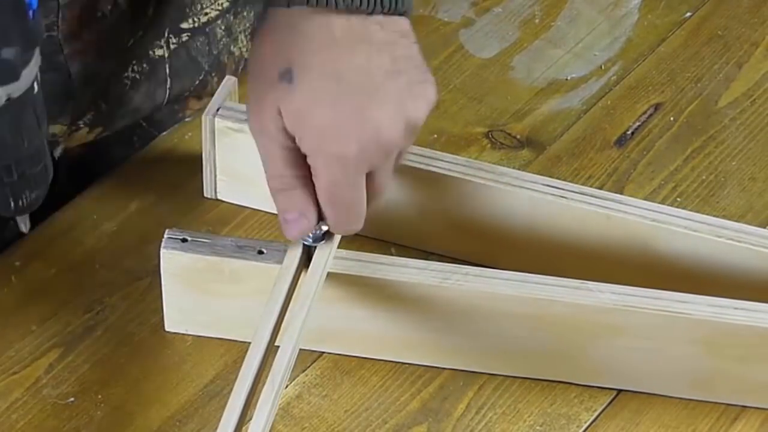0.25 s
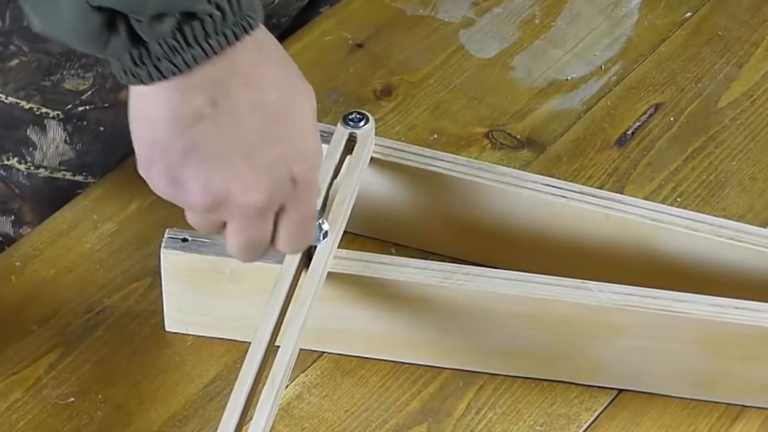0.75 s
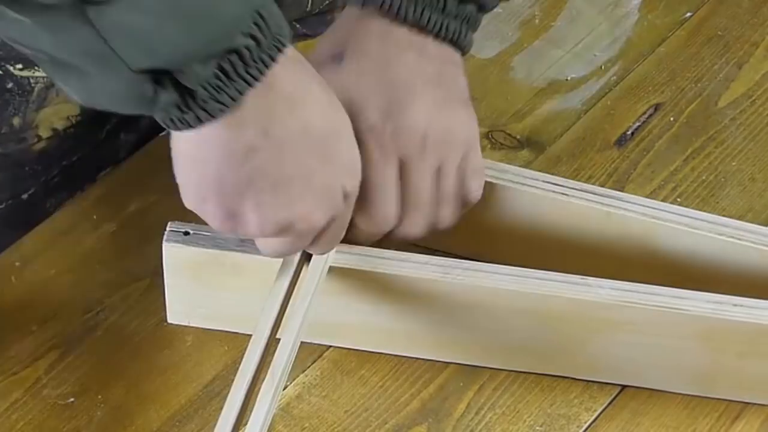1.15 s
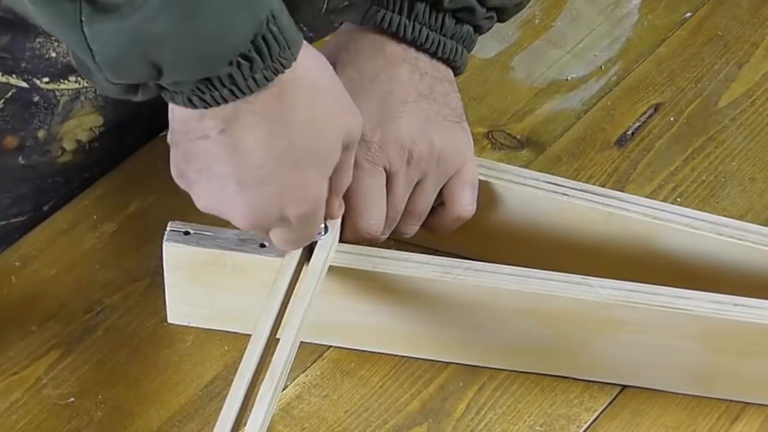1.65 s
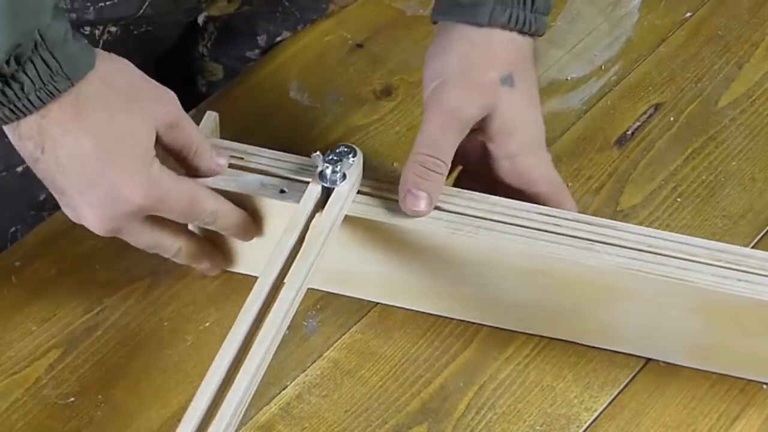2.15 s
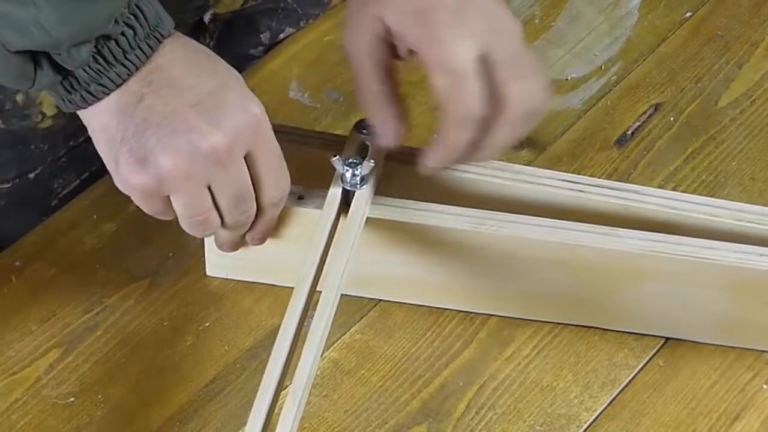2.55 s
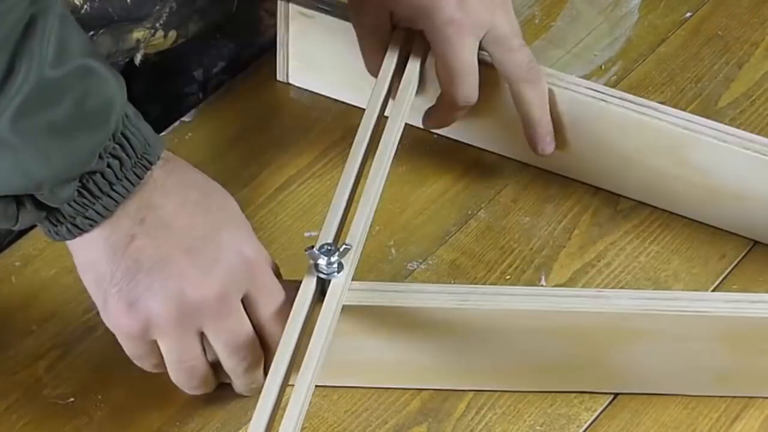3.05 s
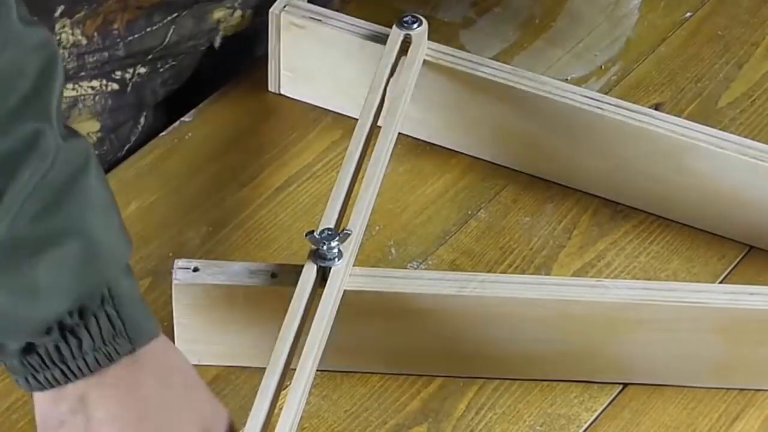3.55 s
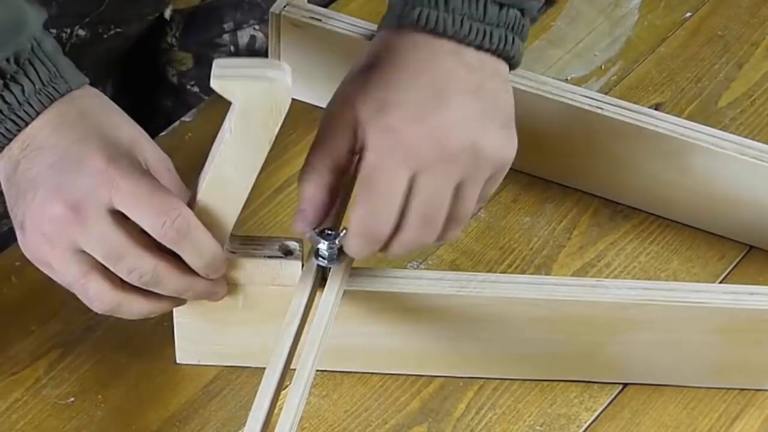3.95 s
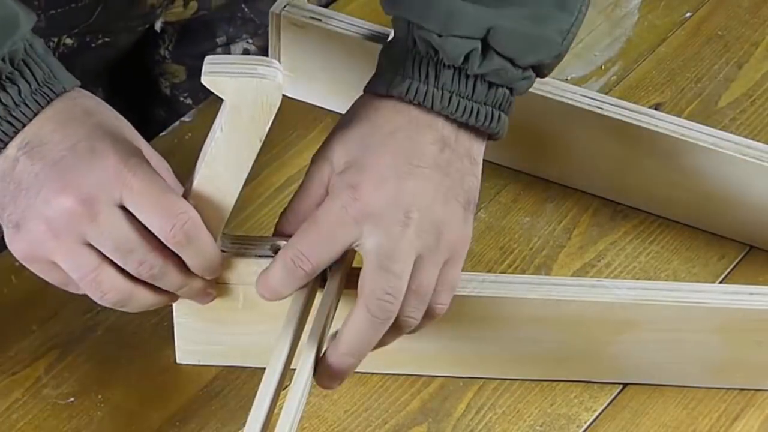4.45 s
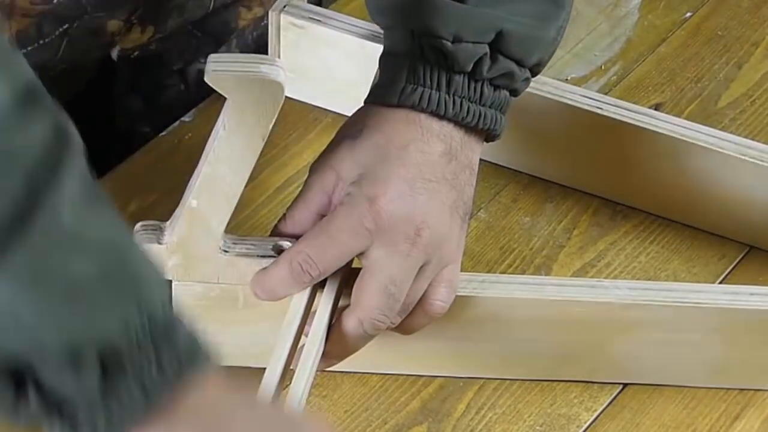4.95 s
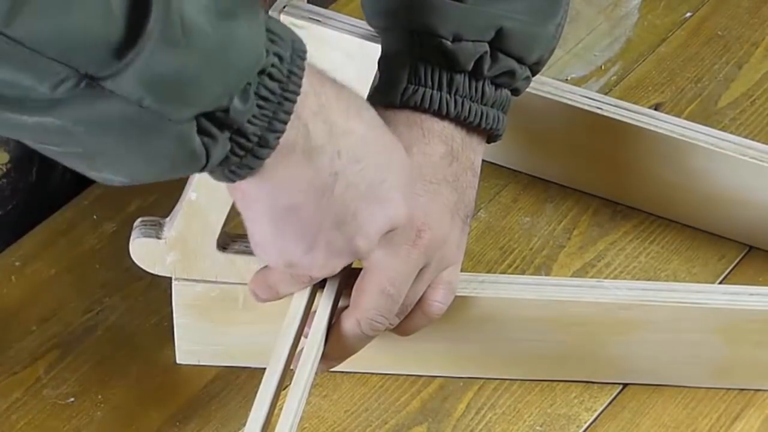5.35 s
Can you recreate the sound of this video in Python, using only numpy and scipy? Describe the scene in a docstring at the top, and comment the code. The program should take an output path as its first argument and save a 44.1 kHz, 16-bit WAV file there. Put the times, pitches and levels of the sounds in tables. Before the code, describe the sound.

Plywood pieces knock and slide against each other up close, with a small metal clink and faint sleeve rustle.

```python
"""At a workbench, close to a small stereo microphone, plywood parts of a jig are knocked and slid together.
Every contact shakes the same boards; most rattles are cut short, fading out within about a tenth
of a second. A wing nut clinks on its bolt three times. Sleeves and fingers rustle in between,
over a faint workshop hiss with a whirr in it."""
import sys
import numpy as np
from scipy import signal
from scipy.io import wavfile

SR = 44100
rng = np.random.default_rng(int(sys.argv[2]) if len(sys.argv) > 2 else 0)


def transcribe(u):
    """Save the signal u as a 16-bit wav file named by the first command-line argument.

    u: samples, shape (n,) or (channels, n), limited to [-1, 1]; the rate is SR.
    q: integer samples, one column per channel.
    """
    v = np.clip(np.atleast_2d(u).T, -1, 1)
    q = np.round(v * 32767).astype(np.int16)
    wavfile.write(sys.argv[1], SR, q)


N = 246519

# Wood on wood: t/s, body level/dB, thud over body/dB, brightness, crack over rattle/dB,
# favoured f/Hz, nominal t60/s
KNOCKS = [(0.071, -55.5, 7.5, -4, 14.5, 1260, 0.17), (0.127, -19, -16.5, -6, 13.5, 1060, 0.25),
          (0.228, -30, -10.5, -22, 12.5, 1145, 0.17), (0.281, -27.5, -10.5, -16, -3.5, 1866, 0.19),
          (0.351, -31, -10.5, -23.5, 11, 1360, 0.14), (0.528, -20, -16.5, -2, -0.5, 1700, 0.14),
          (0.555, -25, -10.5, -8.5, -7, 1063, 0.19), (0.789, -24, 1, -8, 16.5, 432, 0.18),
          (0.8587, -23.5, -11, -33, 11, 1630, .13), (1.057, -42, -8.5, -22, 2, 1125, 0.34),
          (1.092, -37.5, -8, 5, 5, 1550, 0.12), (1.134, -26, -13.5, -7.5, 5.5, 1065, 0.16),
          (1.168, -48, 3.5, 1, 0, 670, 0.18), (1.635, -59.5, -34, 1, 13, 2260, 0.084),
          (1.733, -52, -14, -1, 9, 1010, 0.21), (1.944, -37.5, 0, 0, 9, 1180, .11),
          (2.038, -23, -4.5, -10.5, 9, 1630, 0.14), (2.149, -30.5, -0.5, -6, 12, 1690, 0.18),
          (2.206, -29, -9.5, -12.5, 6.5, 1075, 0.21), (2.231, -40, 3, -2, 1, 1270, 0.24),
          (2.303, -33.5, -10, -9.5, 4.5, 1290, .15), (2.365, -24.5, -10, -2, 0.5, 1170, 0.13),
          (2.388, -24.5, -5, -9, 15, 2330, .18), (2.42, -29.5, -13, -5, -6, 1174, 0.15),
          (2.504, -24.5, -8.5, -12, -5, 1270, 0.12), (2.531, -24, -7.5, -9.5, 7, 1400, .16),
          (2.6, -39.5, -5.5, -16.5, -13, 965, 0.25), (2.713, -57, 3.5, 6, -4.5, 3010, 0.32),
          (2.763, -44.5, -3, -28, 6, 980, 0.37), (2.788, -38.5, -15, -12, 4, 1610, 0.14),
          (2.82, -28.5, -9, -8.5, -6, 1350, 0.13), (2.889, -58.5, 13, -18, 6, 665, 0.11),
          (2.945, -42, -7.5, -19, 5, 990, 0.38), (2.999, -53, 8.5, 10, 6, 1770, 0.44),
          (3.174, -44.5, 3, -27, 2, 674, 0.079), (3.449, -61.5, 11, -27, -15, 520, 0.15),
          (3.622, -41.5, -14, 2, 5.5, 2310, 0.25), (3.676, -25, -14.5, 3, 11.5, 1258, 0.14),
          (3.902, -24.5, -22, -8, 10, 2020, 0.19), (4.903, -22, -7, -3.5, -5, 1770, 0.15),
          (5.004, -34.5, -8.5, 9.5, 5, 2360, 0.17), (5.18, -59.5, -3.5, -1.5, 15.5, 2194, 0.3),
          (5.293, -49, -29, -0.5, 4.5, 2220, 0.15)]
# Factor on t60 for thud, body, clack, tick and air: the low end dies first
BAND_DECAY = [0.6, 0.7, 0.79, 0.8, 1.011]
RISE_S, LENGTH_SHARE = .001, 0.61   # the rattle's attack; its length as a share of the nominal t60


def knocks():
    """A sharp crack, then a rattle that fades out abruptly: both as envelopes in five bands."""
    shaking, cracks = np.zeros((5, N)), np.zeros((5, N))
    for s, body_db, thud_db, brightness, crack_db, hz, t60 in KNOCKS:
        gains = band_gains(body_db, thud_db, brightness, hz, crack_db)
        t = np.arange(round(LENGTH_SHARE * t60 * SR)) / SR
        attack = np.minimum(t / RISE_S, 1)
        decay = amp(-60 * t / np.outer(BAND_DECAY, t60))
        fade_out = np.cos(np.pi / 2 * t / t[-1])
        add(shaking, round(s * SR), gains * attack * decay * fade_out)
        add(cracks, round(s * SR), amp(crack_db) * gains)
    return shaking, cracks


# Wood along wood, and a sleeve brushing past at 3.856 s: peak t/s, body level/dB, brightness, favoured f/Hz,
# length/s
SLIDES = [(0.1, -62.5, 12, 1120, 0.095), (0.113, -39, -32, 1660, 0.028), (.775, -56, 4.5, 1120, 0.16),
          (1.215, -72.5, 11.5, 1070, 0.052), (1.412, -68.5, -10, 667, 0.079), (1.532, -68, 4.5, 1040, 0.12),
          (1.597, -65, 0.5, 1740, 0.052), (1.807, -57, 0.5, 1070, 0.032), (1.92, -53, 7.5, 1090, 0.08),
          (1.981, -67, -15, 1120, 0.11), (2.282, -56, -23, 1320, 0.097), (2.495, -53, 11, 1020, 0.08),
          (3.007, -47, -14, 1305, 0.15), (3.034, -40, 2, 1830, 0.078), (3.084, -43.5, -9, 1100, 0.063),
          (3.187, -48.5, 1, 664, 0.078), (3.648, -46, 2, 1330, 0.031), (3.667, -38.5, -6, 1250, 0.023),
          (3.736, -45.5, 0.5, 1230, 0.081), (3.856, -67.5, 10, 1850, 0.12), (4.12, -66, 3.5, 1800, 0.034),
          (4.194, -66.5, 2, 2590, 0.11), (4.263, -52, -12, 1085, 0.085), (4.325, -57.5, 3, 1910, 0.08),
          (4.872, -56.5, 1.5, 2180, 0.07), (5.197, -65, -10, 2290, 0.17), (5.41, -65, 0.5, 3060, 0.071),
          (5.469, -67, 1, 3070, 0.09), (5.541, -65.5, -3, 2620, 0.068)]
SWELL_SHARE, SLIDE_THUD_DB = 0.33, -14.5   # attack as a share of the length; thud over body


def slides():
    """Rubbing parts shake the boards in a soft swell and a longer fade: envelopes in five bands."""
    shaking = np.zeros((5, N))
    for s, body_db, brightness, hz, length in SLIDES:
        swell, fade = round(SWELL_SHARE * length * SR), round((1 - SWELL_SHARE) * length * SR)
        stroke = np.r_[np.hanning(2 * swell)[:swell], np.hanning(2 * fade)[fade:]]
        add(shaking, round(s * SR) - swell, band_gains(body_db, SLIDE_THUD_DB, brightness, hz) * stroke)
    return shaking


def band_gains(body_db, thud_db, brightness, hz, crack_db=0):
    """Thud, body, clack, tick and air gains of a contact; a higher or harder one clacks more."""
    clack_db, tick_db, air_db = np.array([-2, 1.5, 2.5]) + brightness * np.array([0.37, 0.68, 1.92])
    clack_db += 4.5 * np.log2(hz / 1500) + 0.49 * crack_db
    return amp(body_db + np.array([thud_db, 0, clack_db, tick_db, air_db]))[:, None]


# The ring of the plywood: f/Hz, width/Hz (the narrowest are widened in play), level/dB
BOARD_MODES = [(431, 46, -11), (521, 35.5, -5), (671, 26.7, -4.5), (935.5, 21, -27.5), (1120, 26, -2),
               (1335, 17, -24.5), (1262, 55, -6.5), (1560, 17, -28.5), (1721, 20, -3), (1814, 84, -6),
               (1964, 120, -7.5), (2249, 84, -3), (2607, 110, -6), (3060, 180, -7), (3333, 47, -6.5),
               (3900, 333, -10), (4490, 57, -11.5), (4700, 33, -22), (6600, 540, -17.5)]
# Edges of the thud, body, clack, tick and air bands: f/Hz
BAND_EDGES_HZ = [300, 800, 1700, 3600, 8000, 17000]
# Stereo width of the rattle in those bands: side over mid/dB
WIDTH_DB = [-20, -21.5, -11, -8, -9.5]
GRAIN_DB, BETWEEN_MODES_DB, BUMP_DB = 1.5, -12, 8
MIC_LOW_HZ, RATTLE_TOP_HZ = 353, 8950   # the microphone drops the bass; wood damps the highest tones


def boards(shaking, cracks):
    """Grainy noise rings the boards' modes; each crack arrives ahead of it, bypassing them."""
    grain = amp(GRAIN_DB * flicker(150)) * rng.standard_normal((2, 2, N))   # two mid/side pairs
    rattle, crack = 0, 0
    for k, (low, high) in enumerate(zip(BAND_EDGES_HZ, BAND_EDGES_HZ[1:])):
        width_gain = np.sqrt(SR / 2 / (high - low))
        noise = band(grain[k % 2] * shaking[k] + 1e-12, low, high)   # neighbouring bands unrelated
        rattle += width_gain * noise * [[1], [amp(WIDTH_DB[k])]]
        crack += width_gain * (-1) ** k * band(cracks[k] + 1e-12, low, high)
    crack = np.convolve(crack, np.hanning(4) / 2)[:N]   # wood gives: a rounded contact
    rattle = roll_off(rattle, RATTLE_TOP_HZ, "low", order=1)
    wood = amp(BETWEEN_MODES_DB) * rattle - crack * [[1], [0]]   # the crack sits dead centre
    for (hz, width_hz, level_db), strength in zip(BOARD_MODES, mode_strengths()):
        wood += amp(level_db) * resonance(rattle * strength, hz, max(width_hz, 50, hz / 35))
    wood = roll_off(wood, MIC_LOW_HZ, "high", order=8)
    jolt = grain[1] * (amp(-21) * shaking[0] + amp(-29.5) * shaking[1] + amp(-12) * cracks[0])
    bump = amp(BUMP_DB) * band(jolt, 110, 667, order=1)   # faint weight under each contact
    return left_right(*wood) + left_right(bump[0], 0.33 * bump[1])


def mode_strengths(chance_db=4, favour_db=10, favour_octaves=.05):
    """Each contact drives the modes in a new random balance, hardest near its favoured pitch."""
    onsets = [(s, hz) for s, *_, hz, t60 in KNOCKS]
    onsets += [(s - SWELL_SHARE * length, hz) for s, *_, hz, length in SLIDES]
    onsets = np.array(onsets)
    scatter_db = chance_db * rng.standard_normal((len(onsets), len(BOARD_MODES)))
    octaves_off = np.log2(np.array(BOARD_MODES)[:, 0] / onsets[:, 1:])
    strengths = amp(scatter_db + favour_db * np.exp(-.5 * (octaves_off / favour_octaves) ** 2))
    order = np.argsort(onsets[:, 0])
    latest = np.searchsorted(onsets[order, 0], np.arange(N) / SR, side="right") - 1
    return strengths[order][np.maximum(latest, 0)].T


# Small metal accents: t/s, peak level/dB, lowest partial f/Hz
CLINKS = [(1.631, -46, 2520), (2.149, -29, 5110), (2.714, -56, 3060)]
# The ring of the nut: multiple of the lowest partial, level/dB, width/Hz
NUT_PARTIALS = [(1, 0, 70), (1.48, -14, 120)]


def wing_nut(t60=0.083):
    """The nut clinks on its bolt: a short jingle of noise rings narrow metal partials."""
    out, t = np.zeros((1, N)), np.arange(round(.1 * SR)) / SR
    for s, level_db, hz in CLINKS:
        jingle = rng.standard_normal(len(t)) * amp(-60 * t / t60)
        ring = sum(amp(db) * resonance(jingle, hz * ratio, width) for ratio, db, width in NUT_PARTIALS)
        add(out, round(s * SR), amp(level_db) * ring[None] / np.abs(ring).max())
    return out


# Fader moves of the rustle: t/s, level below about 3 kHz/dB, level above/dB
RUSTLE_LEVELS = [(0.0, -63.5, -64.5), (0.12, -58.5, -59), (0.3, -59, -62.5), (0.55, -63.5, -67.5),
                 (0.68, -62, -59.5), (1.039, -61.5, -64.5), (1.57, -69, -74), (1.8, -67, -71),
                 (2.01, -58, -62), (2.13, -63.5, -67.5), (2.4, -56.5, -58), (2.79, -63.5, -72),
                 (2.94, -56.5, -59), (3.3, -64.5, -65), (3.559, -67, -68), (3.69, -54, -58),
                 (3.8, -63.5, -66), (4.599, -69, -73.5), (5.041, -63, -66.5), (5.59, -68, -74)]
# Tone of the hiss: f/Hz, relative spectral level/dB
HISS_COLOUR = [(40, -42), (270, -20), (400, -10.5), (800, -8.5), (1750, -6), (2830, -8), (9000, -12),
               (15000, -15.5)]
# Stereo width of the hiss: f/Hz, side over mid/dB
HISS_WIDTH = [(60, -4), (240, 4), (950, 8.5), (3770, 3.5), (15000, -4)]


def rustle_and_hiss():
    """Workshop hiss in half-octave bands; its lows and highs swell as sleeves and fingers move."""
    s, low_db, high_db = np.transpose(RUSTLE_LEVELS)
    layers, edges = [0, 0], 35 * 2 ** np.arange(0, 9.1, .5)
    white = rng.standard_normal((2, 2, N))
    waver_db = 0.77 * flicker(6)
    for k, (low, high) in enumerate(zip(edges, edges[1:])):
        hz = np.sqrt(low * high)
        mid, side = band(white[k % 2], low, high)
        gain = amp(at_hz(HISS_COLOUR, hz) + waver_db)
        layers[int(hz > 3000)] += gain * left_right(mid, amp(at_hz(HISS_WIDTH, hz)) * side)
    t = np.arange(N) / SR
    return sum(amp(np.interp(t, s, db)) * unit_rms(x) for db, x in zip((low_db, high_db), layers))


def whirr(hz=1732, width_hz=170, level_db=-78):
    """A thin, narrow band of noise whose level flutters."""
    tone = resonance(resonance(rng.standard_normal(N), hz, width_hz), hz, 2 * width_hz)
    return amp(level_db + 1.7 * flicker(11)) * unit_rms(tone)


def amp(db):
    """dB to gain."""
    return 10 ** (np.asarray(db) / 20)


def unit_rms(x):
    """Scale to unit rms."""
    return x / np.sqrt(np.mean(x ** 2) + 1e-20)


def at_hz(points, hz):
    """Read a curve on a log frequency axis."""
    freqs, levels = np.transpose(points)
    return np.interp(np.log(hz), np.log(freqs), levels)


def band(x, low, high, order=2):
    """Butterworth band-pass."""
    return signal.sosfilt(signal.butter(order, [low, high], "band", fs=SR, output="sos"), x)


def roll_off(x, hz, kind, order):
    """Butterworth low-pass or high-pass."""
    return signal.sosfilt(signal.butter(order, hz, kind, fs=SR, output="sos"), x)


def resonance(x, hz, width_hz):
    """Two-pole peak, gain 1 on top."""
    r = np.exp(-np.pi * width_hz / SR)
    feedback = [1, -2 * r * np.cos(2 * np.pi * hz / SR), r * r]
    return signal.lfilter(np.array([1, 0, -1]) * (1 - r * r) / 2, feedback, x)


def flicker(rate_hz):
    """Low-passed noise, spread about 1."""
    r = np.exp(-2 * np.pi * rate_hz / SR)
    return unit_rms(signal.lfilter([1], [1, -2 * r, r * r], rng.standard_normal(N + SR)))[SR:]


def left_right(mid, side):
    """Two channels from mid and side."""
    return np.array([mid + side, mid - side])


def add(track, start, shape):
    """Mix a shape into the tracks at a sample."""
    start = max(start, 0)
    track[:, start:start + shape.shape[1]] += shape[:, :N - start]


def scene():
    """Knocked and rubbed boards up front, the nut beside them, rustle, hiss and whirr behind."""
    shaking, cracks = knocks()
    return boards(shaking + slides(), cracks) + wing_nut() + rustle_and_hiss() + whirr()


def record(dry):
    """The top rolls off, then is cut."""
    soft = roll_off(dry, 15800, "low", order=8)
    return signal.sosfilt(signal.cheby2(12, 70, 16900, fs=SR, output="sos"), soft)


dry = scene()
out = record(dry)
transcribe(out)
```